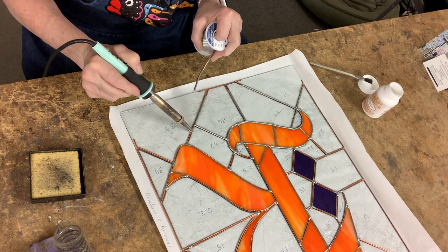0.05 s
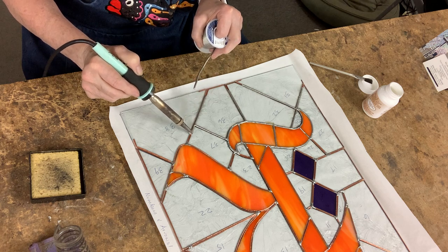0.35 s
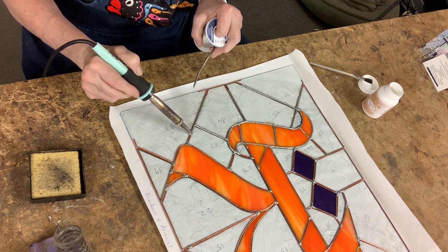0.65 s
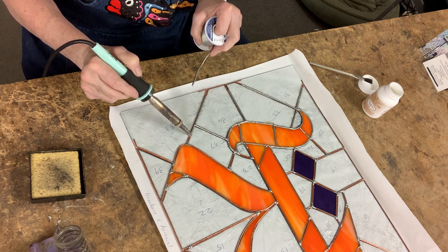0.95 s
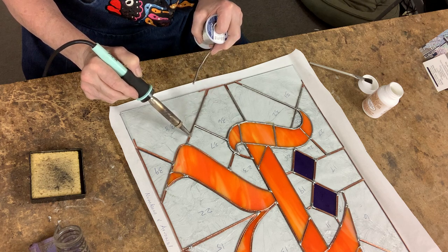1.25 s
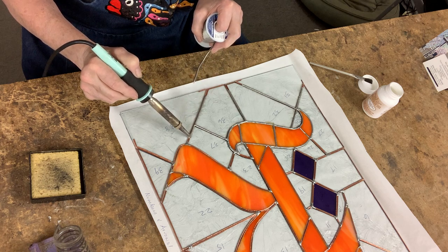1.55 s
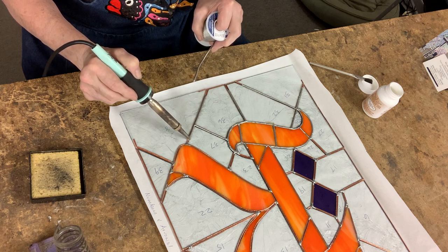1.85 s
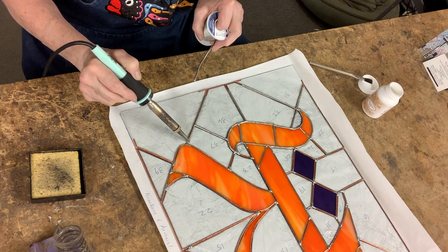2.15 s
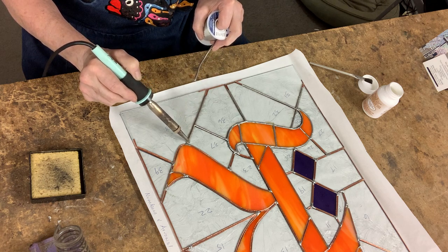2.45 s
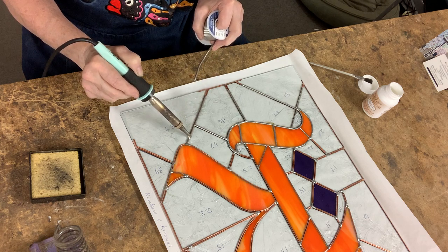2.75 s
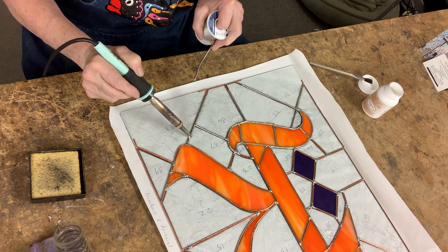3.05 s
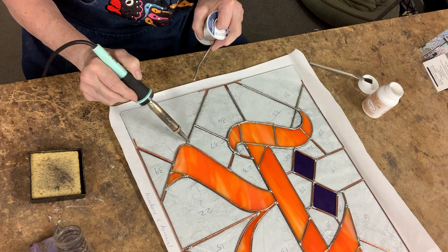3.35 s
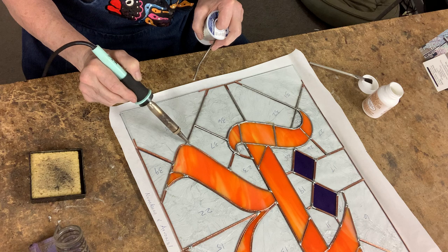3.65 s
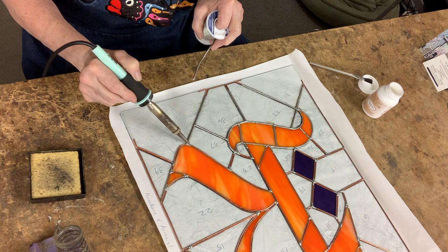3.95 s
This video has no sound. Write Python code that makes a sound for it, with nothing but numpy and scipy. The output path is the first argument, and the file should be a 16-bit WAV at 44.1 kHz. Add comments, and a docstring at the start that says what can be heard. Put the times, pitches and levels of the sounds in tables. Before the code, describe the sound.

Flux sizzling steadily under a hot soldering iron, breaking off briefly and then resuming.

```python
"""Soldering a stained-glass panel

A hot iron rubs along a fluxed seam, and the flux boils off in thousands of tiny bursts a second, with
a few sharper spits. The sizzle breaks off as the tip lifts near 3 s, then resumes. Reflections off the
panel give it a slowly sliding colour. Underneath sit a low room rumble and a faint hum."""
import sys
import numpy as np
from scipy import signal
from scipy.fft import rfft, irfft
from scipy.io import wavfile

SR = 44100
rng = np.random.default_rng(int(sys.argv[2]) if len(sys.argv) > 2 else 0)


def int16_out(signal):
    """Quantize to a 16-bit WAV file."""
    q = np.round(np.clip(np.atleast_2d(signal).T, -1, 1) * 32767)
    wavfile.write(sys.argv[1], SR, q.astype(np.int16))


N = 176400

# Tone of the room rumble. Each row: frequency in Hz, relative level in dB.
RUMBLE_EQ = [(20, -13), (35, -6.5), (55, -4), (80, -3), (110, 0.5), (170, -11), (300, -16.5), (550, -18),
             (750, -24.5), (1000, -31), (1450, -28), (1720, -21), (2100, -27.5), (3000, -35.5),
             (15000, -57)]
# Stereo width of the rumble. Each row: frequency in Hz, side against middle in dB.
RUMBLE_WIDTH = [(50, -14), (150, -8.5), (300, -12.5), (600, -0.5), (3000, -13)]
# Soft low swells. Each row: peak time and half length in seconds, centre in Hz, width in octaves,
# level in dB.
LOW_SWELLS = [(0.68, 0.08, 100, 0.45, -62), (0.83, 0.23, 165, 0.6, -61), (0.8, 0.24, 480, .35, -67.5),
              (0.985, 0.03, 524, 0.15, -68), (1.175, 0.022, 95, 0.35, -62), (1.325, 0.025, 69, 0.22, -60),
              (1.865, 0.04, 100, 0.7, -54), (1.94, 0.034, 62, .35, -54), (3.23, 0.022, 106, 0.27, -58)]
# Steady hum. Each row: frequency in Hz, level in dB.
HUM_TONES = [(59.2, -72), (119.6, -79.5), (239, -82), (479.1, -81.5), (597.5, -84.5), (839.8, -85.5),
             (1712, -81)]
# Tone of the room's reverb. Each row: frequency in Hz, gain in dB.
REVERB_EQ = [(300, -3.5), (700, -2), (1500, -7), (2800, -8.5), (3700, -11), (5300, -9), (6000, -18),
             (6600, -10), (7800, -11), (9400, -32), (11500, -13), (13400, -28), (15000, -15)]
# Treble dips at the microphone. Each row: centre in Hz, half width in Hz, gain in dB.
MIC_NOTCHES = [(5790, 110, -10), (8230, 170, -4.5), (12380, 130, -3)]
# Phase between the channels. Each row: frequency in Hz, lead of left over right in radians.
MIC_PHASE = [(4600, 0), (5300, -1.7), (5620, -1.1), (5850, -2.9), (6080, -3.1), (6330, -1.6), (6600, -2.1),
             (7000, -1.1), (7900, .3), (8250, 1.3), (9100, 2.9), (9550, 3.35), (11350, 6.28), (13200, 9.25),
             (13600, 9.6), (15100, 12.5), (15700, 13.2)]
# Bands cancelled by panel and bench reflections. Each row: centre and half width in Hz, base gain in dB.
PANEL_NOTCHES = [(1080, 316, -3), (1905, 103, -6), (2760, 100, -15.5), (3685, 87, -15), (4700, 110, -6.5),
                 (6664, 105, -12.5), (7870, 210, -3), (8400, 73, -3.5)]
# How the moving tip shifts those bands. Each row: time in seconds, frequency factor, depth factor.
NOTCH_SWEEP = [(0, 1.04, 0.59), (1.0, 1.024, 0.62), (1.3, 1.027, 0.62), (1.5, 1.02, 1.1), (2.1, 0.99, 0.89),
               (2.55, 0.98, .85), (2.85, 1, 1), (3.11, 1.003, 1.8), (3.3, .99, 0.93), (3.6, 0.95, 0.75),
               (4, 1.01, 0.78)]
# Envelope of the tip's rubbing. Each row: time in seconds, level in dB.
RUB_ENVELOPE = [(0, -69), (.28, -76), (.33, -64.5), (.41, -62), (.5, -69), (1.0, -67.5), (1.62, -76.5),
                (1.75, -61.5), (1.9, -68), (2.15, -65), (2.35, -63.5), (2.72, -63), (2.83, -82), (3.1, -88),
                (3.19, -73), (3.28, -70), (3.4, -61), (3.53, -62.5), (3.61, -57), (3.68, -63.5),
                (3.78, -60.5), (4, -63.5)]
# Tone of the rubbing. Each row: frequency in Hz, relative level in dB.
RUB_EQ = [(250, -13), (600, -2.5), (860, 3.5), (1200, -1.5), (1600, 4.5), (2300, -3.5), (3200, 0),
          (4200, -8), (7000, -22.5)]
# How hard the flux boils. Each row: time in seconds, relative level in dB.
BOIL_ENVELOPE = [(0.0, -52.5), (0.15, -47), (0.28, -48.5), (0.41, -45), (0.44, -46.5), (0.54, -47),
                 (1.2, -46), (1.74, -47.5), (2.52, -47), (2.78, -49.5), (2.82, -53), (2.88, -52.5),
                 (2.99, -57.5), (3.0, -66), (3.05, -69), (3.09, -54), (3.16, -52), (3.24, -55), (3.27, -48),
                 (3.3, -51), (3.36, -47), (3.98, -48), (4.0, -48)]
# Tone of the sizzle. Each row: frequency in Hz, relative level in dB.
SIZZLE_EQ = [(200, -28.5), (700, -19), (1200, -14), (1600, -13.5), (2300, -8.5), (3300, -9), (4300, -3.5),
             (5000, -7), (5400, -5), (6300, -3.5), (7400, -1), (8300, -1.5), (9300, -1.5), (10500, .5),
             (11800, 2.5), (12400, 0), (13300, -0.5), (14200, 2), (15000, -1), (15550, 2.5)]
# Fuller or thinner sizzle. Each row: time in seconds, gain below BODY_EDGE_HZ in dB.
SIZZLE_BODY = [(0, -3), (.35, -0.5), (.5, -2.5), (1.6, -1), (2.0, -1.5), (2.6, 1.5), (2.9, 1), (3.16, 0.5),
               (3.25, -2), (3.6, 1.5), (4, 1)]
# Larger spits of flux. Each row: start in seconds, level over the boil in dB.
FLUX_SPITS = [(.3103, 11), (.4028, 11), (.4053, 16), (.4115, 10), (.4178, 16), (.421, 9), (.431, 15),
              (1.6966, 14), (2.0413, 10), (2.9854, 11), (3.2782, 13), (3.2977, 10), (3.3018, 11),
              (3.308, 12), (3.6746, 10)]

RUMBLE_DB, LEFT_BIAS_DB = -64, 1.5
REVERB_T60_S, HIGH_CUT_HZ = 0.21, 15720
BURSTS_PER_S, BURST_SPREAD_DB, VAPOUR_DB = 9000, 3.5, -2
SPUTTER_DB, SPUTTER_HZ, SURGE_DB, SURGE_HZ = 0.67, 218, 0.76, 25
SIZZLE_GAIN_DB, BODY_EDGE_HZ, SPIT_DECAY_S = 5, 6400, 0.0003


def undb(db):
    """Decibels to gain."""
    return 10 ** (np.asarray(db) / 20)


def unit(x):
    """Scale to rms 1."""
    return x / np.sqrt(np.mean(x ** 2))


def curve(table, at):
    """Straight lines through the rows of a table."""
    return np.interp(at, *np.array(table, float).T)


def bins():
    """Frequencies of the spectrum in Hz."""
    return np.maximum(np.arange(N // 2 + 1) * SR / N, 1e-3)


def eq(x, table):
    """Minimum-phase EQ through (Hz, dB) points."""
    hz, db = np.array(table, float).T
    gain = undb(np.interp(np.log(bins()), np.log(hz), db))
    cepstrum = irfft(np.log(gain), N)
    cepstrum[1:N // 2] *= 2
    cepstrum[N // 2 + 1:] = 0
    return irfft(rfft(x) * np.exp(rfft(cepstrum)), N)


def notch_db(hz, notches):
    """Gain in dB of a set of bell-shaped notches."""
    return sum(db * np.exp(-.5 * ((hz - centre) / width) ** 2) for centre, width, db in notches)


def wobble(rate_hz):
    """Smooth random modulation at rms 1, mostly slower than rate_hz."""
    slow = rfft(rng.standard_normal(N)) / (1 + (bins() / rate_hz) ** 2)
    return unit(irfft(slow * bins() / (bins() + rate_hz / 10), N))


def room_tone(t):
    """A stereo bed of low rumble, soft swells and faint hum, leaning slightly left."""
    rumble = undb(RUMBLE_DB) * unit(eq(rng.standard_normal((2, N)), RUMBLE_EQ))
    for peak, half_length, hz, octaves, db in LOW_SWELLS:
        bell = np.exp(-.5 * (np.log2(bins() / hz) / octaves) ** 2)
        band = unit(irfft(rfft(rng.standard_normal((2, N))) * bell, N))
        rumble += undb(db) * band * np.exp(-.5 * ((t - peak) / half_length) ** 2)
    hum = sum(undb(db) * np.sqrt(2) * np.sin(2 * np.pi * (hz * t + rng.random())) for hz, db in HUM_TONES)
    mid, side = rumble[0] + hum, eq(rumble[1], RUMBLE_WIDTH)
    return np.array([mid + side, mid - side]) * undb(LEFT_BIAS_DB * np.array([[.5], [-.5]]))


def workshop_space(x, t):
    """The close sound, its treble out of phase between the channels, plus a short diffuse reverb."""
    left = rfft(x) * undb(notch_db(bins(), MIC_NOTCHES))
    right = left * np.exp(-1j * curve(MIC_PHASE, bins()))
    direct = irfft(np.array([left, right]), N)
    tail = rng.standard_normal((2, N)) * np.exp(-np.log(1000) * t / REVERB_T60_S)
    tail /= np.sqrt(np.sum(tail ** 2, axis=1, keepdims=True))
    return direct + signal.fftconvolve(eq(x, REVERB_EQ)[None], tail, axes=1)[:, :N]


def panel_reflection(x):
    """The bounce off the panel cancels narrow bands, which slide and change depth as the tip moves."""
    hz, frame_times, frames = signal.stft(x, SR, nperseg=1024)
    times, slides, depths = np.array(NOTCH_SWEEP, float).T
    slide = np.interp(frame_times, times, slides)
    depth = np.interp(frame_times, times, depths)
    cut_db = depth * notch_db(hz[:, None] / slide, PANEL_NOTCHES)
    return signal.istft(frames * undb(cut_db), SR)[1][:N]


def tip_rub(t):
    """Fine, grainy friction of the tip dragging on the solder."""
    grain = rng.standard_normal(N) * undb(1.46 * wobble(rate_hz=100))
    return unit(eq(grain, RUB_EQ)) * undb(curve(RUB_ENVELOPE, t))


def flux_sizzle(t):
    """Tiny bubbles of uneven size burst over a hiss of vapour; the boiling flux sputters and spits."""
    triggers = rng.random(N) < BURSTS_PER_S / SR
    sizes = undb(BURST_SPREAD_DB * np.clip(rng.standard_normal(N), -2.6, 2.6))
    bursts = unit(triggers * sizes * rng.choice([-1, 1], N))
    vapour = undb(VAPOUR_DB) * rng.standard_normal(N)
    flutter_db = SPUTTER_DB * wobble(SPUTTER_HZ) + SURGE_DB * wobble(SURGE_HZ)
    boil = unit((bursts + vapour) * undb(flutter_db))
    spray = rng.standard_normal(N)
    for start, db in FLUX_SPITS:
        age = np.maximum(t - start, 0)
        boil += (t >= start) * undb(db) * np.exp(-age / SPIT_DECAY_S) * spray
    sizzle = unit(eq(boil, SIZZLE_EQ))
    body = irfft(rfft(sizzle) / (1 + (bins() / BODY_EDGE_HZ) ** 6), N)
    sizzle += (undb(curve(SIZZLE_BODY, t)) - 1) * body  # low shelf with a moving gain
    return sizzle * undb(curve(BOIL_ENVELOPE, t) + SIZZLE_GAIN_DB)


def scene():
    """Sizzle and rub, coloured by the panel and the workshop, over the room tone."""
    t = np.arange(N) / SR
    soldering = panel_reflection(flux_sizzle(t) + tip_rub(t))
    return workshop_space(soldering, t) + room_tone(t)


def record(dry):
    """A steep high cut takes off the very top."""
    return signal.sosfilt(signal.ellip(12, .2, 70, HIGH_CUT_HZ, fs=SR, output="sos"), dry)


dry = scene()
out = record(dry)
int16_out(out)
```